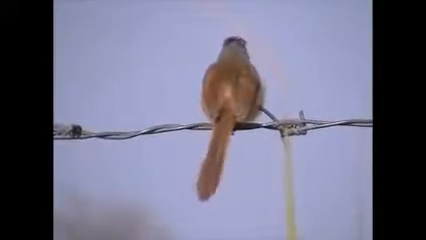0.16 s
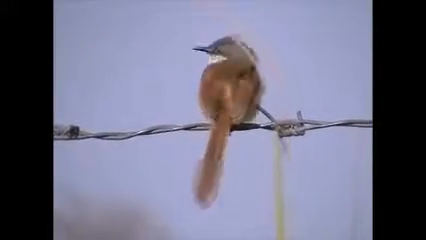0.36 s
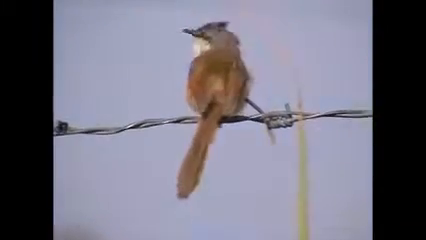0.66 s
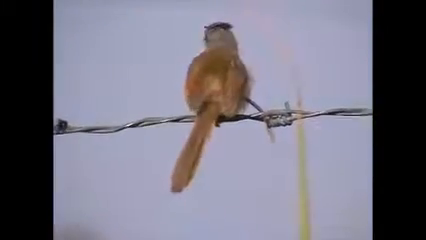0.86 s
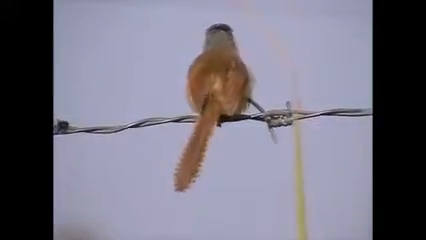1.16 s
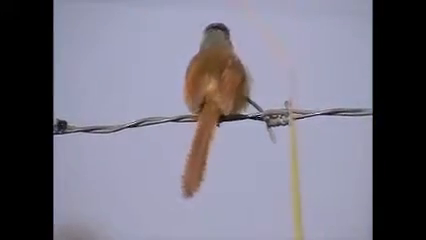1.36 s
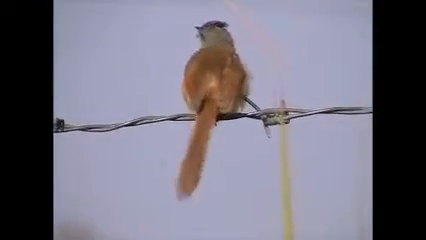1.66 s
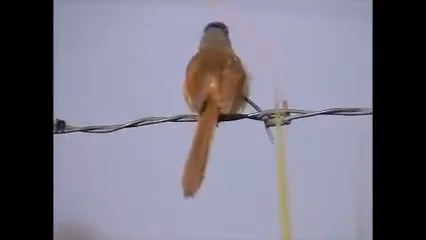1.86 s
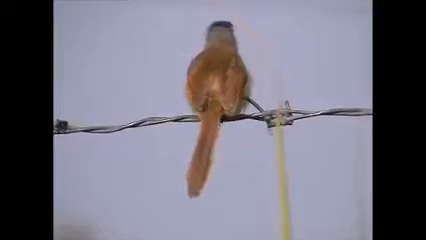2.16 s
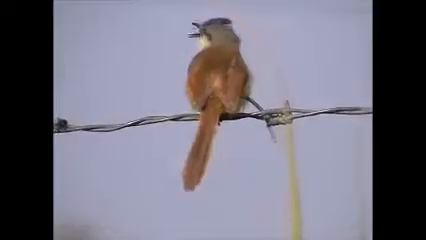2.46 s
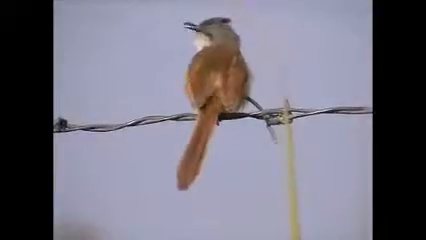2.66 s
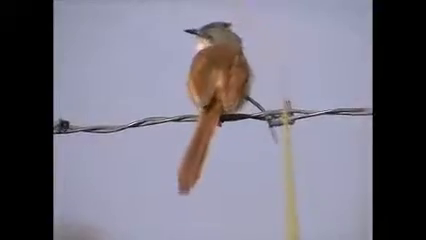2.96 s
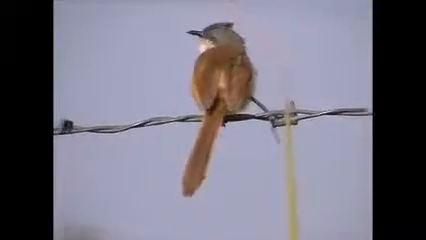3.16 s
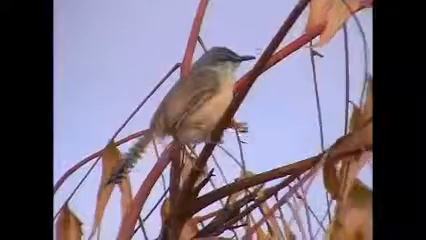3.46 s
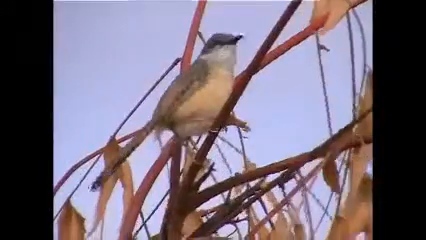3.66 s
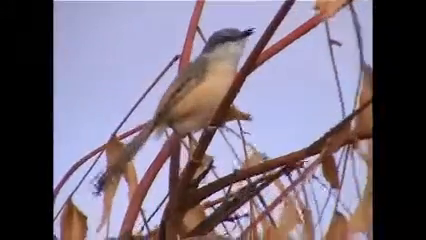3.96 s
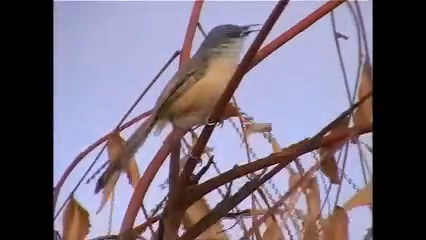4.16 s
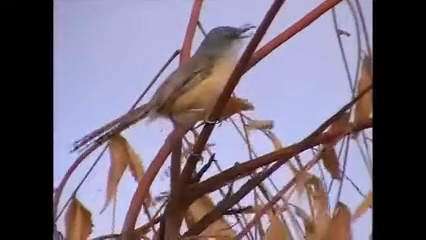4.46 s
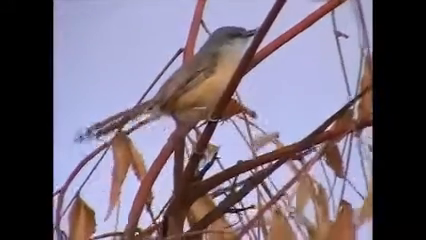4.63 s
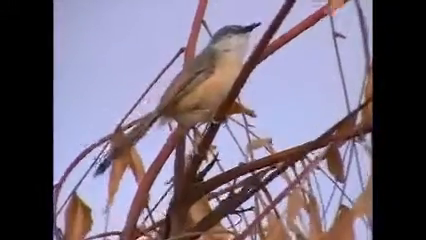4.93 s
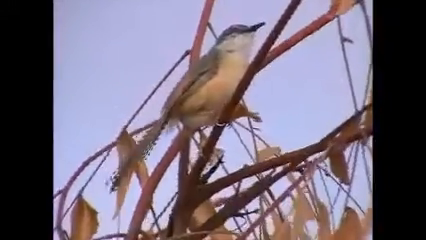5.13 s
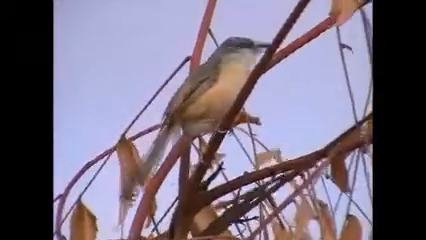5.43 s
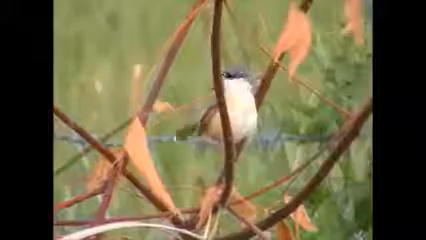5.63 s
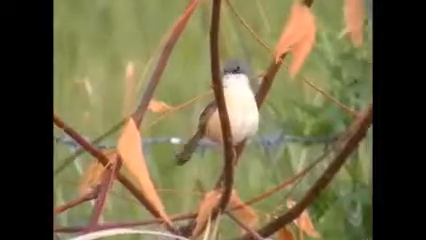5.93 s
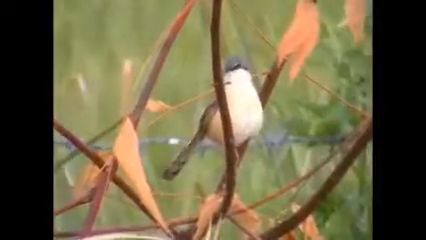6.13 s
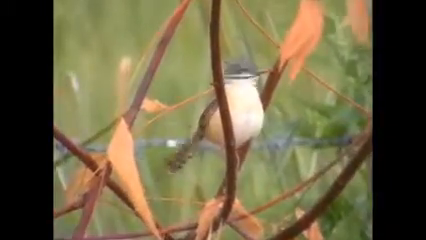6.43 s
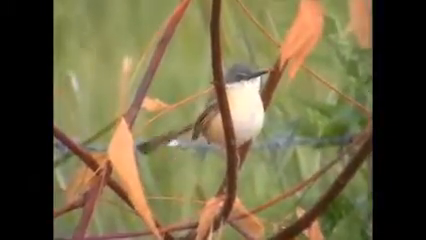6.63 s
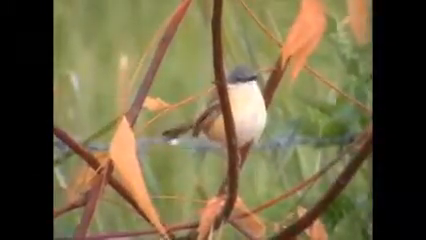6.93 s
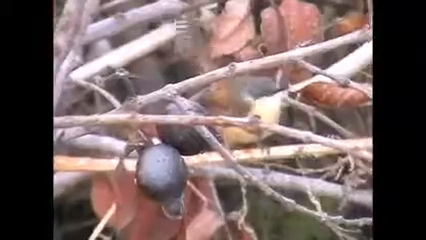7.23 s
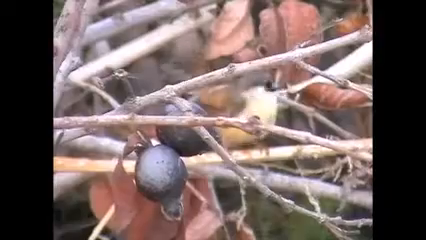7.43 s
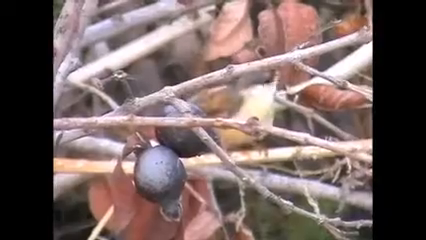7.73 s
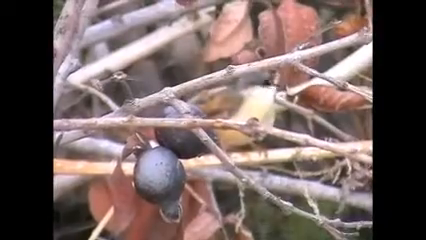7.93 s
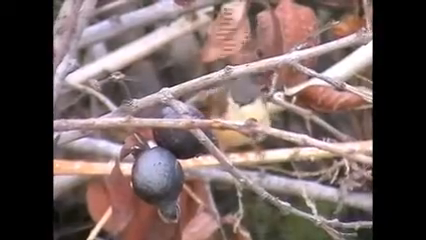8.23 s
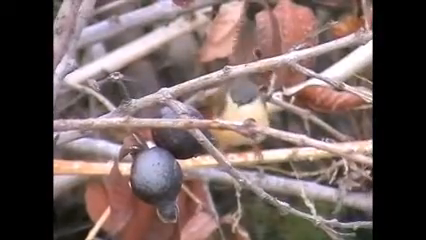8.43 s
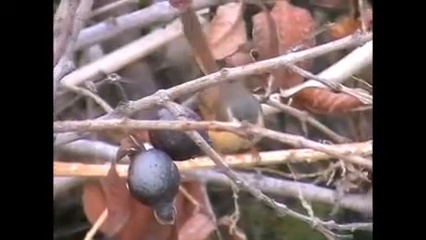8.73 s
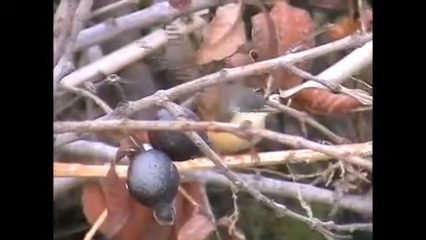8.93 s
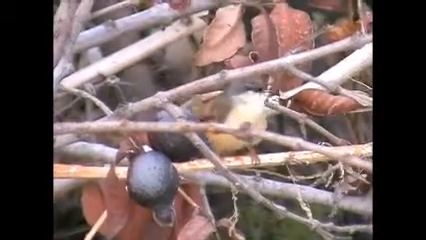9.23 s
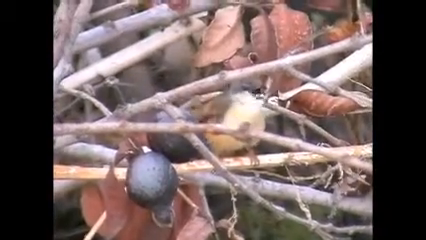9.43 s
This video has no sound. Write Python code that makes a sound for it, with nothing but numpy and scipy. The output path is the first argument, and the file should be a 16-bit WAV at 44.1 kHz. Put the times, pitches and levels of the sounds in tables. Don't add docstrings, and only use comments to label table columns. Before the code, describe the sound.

Quick runs of thin piercing chirps from a small warbler outdoors, with faint distant birds, a far cockerel, late crow caws and microphone hiss.

```python
import sys
import numpy as np
from scipy import signal
from scipy.io import wavfile
from scipy.ndimage import uniform_filter1d

SR = 44100
rng = np.random.default_rng(int(sys.argv[2]) if len(sys.argv) > 2 else 0)


def dump_mix(stems):
    frames = np.atleast_2d(stems).T
    limited = np.clip(frames, -1, 1)
    pcm = np.round(limited * 32767).astype(np.int16)
    wavfile.write(sys.argv[1], SR, pcm)


def how_loud(loudness_db):
    steps = np.asarray(loudness_db, float) / 20
    return 10 ** steps


N = 422919


def band(x, centre_hz, width_hz):
    edges = [centre_hz - width_hz / 2, centre_hz + width_hz / 2]
    y = signal.sosfilt(signal.butter(2, edges, "bandpass", fs=SR, output="sos"), x)
    return y / np.sqrt(np.mean(y ** 2))


def walk(rate_hz):
    hold = int(SR / rate_hz)
    steps = np.repeat(rng.standard_normal(N // hold + 1), hold)
    return 2.4 * uniform_filter1d(uniform_filter1d(steps, hold), hold)[:N]


def bump(middle_s, length_ms):
    t = np.arange(N) / SR
    return np.exp(-.5 * ((t - middle_s) / (length_ms / 3000)) ** 2)


def field():
    # f/Hz, level/dB per Hz
    air = np.array([(25, -27.5), (95, -9.5), (190, -5.5), (300, -9), (1200, -2.5), (3900, -6.5),
                    (6300, -14), (8000, -21), (13000, -38.5)])
    # t/s, rumble/dB, hush/dB, hiss/dB
    backgrounds = [
        [(0.0, -64, -50.5, -69), (2.99, -64.5, -52, -68), (3.39, -64.5, -51, -73)],
        [(3.43, -69.5, -52.5, -68), (6.53, -64.5, -50, -63), (7.05, -65.5, -51, -69.5)],
        [(7.07, -83, -58.5, -68), (8.02, -64.5, -54.5, -69), (9.59, -65.5, -52.5, -69)],
    ]
    t = np.arange(N) / SR
    s, *levels = np.vstack(backgrounds).T
    change = np.array([np.interp(t, s, db) - np.mean(db) for db in levels])
    swell = walk(1.8)
    out = 0
    for hz in 28 * 2 ** np.arange(0, 9.1, .5):
        mid, side = (band(rng.standard_normal(N), hz, .46 * hz) for _ in range(2))
        shares = [np.interp(np.log(hz), np.log([200, 1000, 3200]), row) for row in np.eye(3)]
        db = np.interp(np.log(hz), np.log(air[:, 0]), air[:, 1]) + 10 * np.log10(hz) + shares @ change
        stereo = mid + how_loud(-19) * side * np.array([[1], [-1]])
        out = out + how_loud(db + .8 * swell + 1.2 * walk(9)) * stereo
    out = signal.sosfilt(signal.butter(10, 13300, fs=SR, output="sos"), out)
    return out * how_loud(-48.5) / np.sqrt(np.mean(out ** 2))


def cockerel():
    # start t/s, end t/s, f/Hz, level/dB
    start, end, hz, db = (.78, 2.8, 765, -59)
    t = np.arange(N) / SR
    phase = 2 * np.pi * np.cumsum(hz * (1 + .0038 * walk(25))) / SR
    gate = uniform_filter1d(1. * ((t > start) & (t < end)), 3000)
    level = gate * how_loud(db - 1.3 * (t - start) + 1.2 * walk(6.24))
    return level * (np.sin(phase) + 1.5 * np.sin(2 * phase) + 1.4 * np.sin(3 * phase))


def crows():
    # middle t/s, level/dB
    caws = [
        (8.13, -48),
        (8.51, -48.5),
        (8.81, -52),
        (9.19, -48.5),
    ]
    # f/Hz, width/Hz, level/dB
    resonances = [
        (700, 91, -8),
        (1060, 50, -10.5),
        (1646, 91, -6),
    ]
    t = np.arange(N) / SR
    rasp = rng.standard_normal(N) * (1 + .6 * np.sin(2 * np.pi * 65 * t))
    throat = sum(how_loud(db) * band(rasp, hz, width) for hz, width, db in resonances)
    return throat * sum(how_loud(db) * bump(s, 200) for s, db in caws)


def buzzes():
    # middle t/s, length/ms, centre f/Hz, width/Hz, level/dB
    bursts = [
        (7.015, 60, 6300, 1300, -33),
        (4.42, 140, 2150, 600, -44),
        (4.03, 70, 2600, 500, -43),
        (.735, 14, 2800, 1500, -41),
    ]
    throb = rng.standard_normal(N) * how_loud(4.7 * walk(150))
    out = 0
    for s, ms, hz, width, db in bursts:
        rasp = band(band(throb, hz, width), hz, 2 * width)
        out = out + how_loud(db) * bump(s, ms) * rasp
    return out


def twig_ticks():
    # t/s, peak level/dB
    ticks = [
        (3.7589, -25.5),
        (5.439, -23.5),
        (8.986, -27),
    ]
    crack = band(band(rng.standard_normal(N), 8500, 8000), 8500, 8000)
    t = np.arange(N) / SR
    return crack * sum(how_loud(db - 10) * (t > s) * np.exp(-np.abs(t - s) / .002) for s, db in ticks)


def voice(waver):
    return np.array([np.zeros(N), np.zeros(N), waver * walk(260)])


def whistle(out, loudest_s, ms, start_hz, end_hz, db, peak=.5, early=1, late=1, lead=.15, full=1.3):
    size = int(ms * SR / 1000)
    rise, lead = int(np.clip(peak, .1, .9) * size), int(lead * size)
    steps = np.arange(-lead, size)
    u = steps / size
    place = int(loudest_s * SR) - rise + steps
    hz = end_hz + (start_hz - end_hz) * (1 - np.sign(u) * np.abs(u) ** late) ** early
    phase = 2 * np.pi * np.cumsum(hz * (1 + out[2, place % N])) / SR
    attack = np.sin(np.pi / 2 * np.arange(lead + rise) / (lead + rise)) ** full
    release = np.cos(np.pi / 2 * np.linspace(0, 1, size - rise)) ** .9
    swell = np.r_[attack, release]
    overtones = np.sin(2 * phase) + .5 * np.sin(3 * phase / 2)
    note = np.array([swell * np.sin(phase), swell ** 1.5 * (4000 / hz) ** 2 * overtones])
    inside = (place >= 0) & (place < N)
    out[:2, place[inside]] += how_loud(db) * note[:, inside]


def neighbours():
    # start t/s, end t/s, rate/Hz, length/ms, start f/Hz, end f/Hz, level/dB
    whistlers = [
        (.8, 2.85, 6.3, 170, 2920, 2520, -47),
        (.1, .75, 3.3, 190, 2700, 2850, -47),
        (7.28, 7.42, 21, 30, 2750, 2950, -39),
    ]
    twitter_db = (-52, -42)
    out = voice(waver=.006)
    for start, end, rate, ms, start_hz, end_hz, db in whistlers:
        for s in np.arange(start + ms / 2000, end, 1 / rate):
            late, sharp, loud = rng.standard_normal(3)
            first_hz = start_hz * (1 + .025 * sharp)
            whistle(out, s + .15 * late / rate, ms, first_hz, end_hz, db + 3 * loud, full=.6)
    for (start, end), db in zip([(0, N / SR), (5.85, 7.05)], twitter_db):
        for when, pitch, length, bend, far in rng.random((85, 5)):
            s = start + (end - start) * when
            hz = 2200 + 4000 * pitch ** 1.7
            whistle(out, s, 10 + 30 * length, hz, hz * (.7 + .5 * bend), db - 9 * far, early=1.6)
    return out[0]


def echoes(x, bounce_ms, t60_s):
    t = np.arange(SR // 2) / SR
    decay = 10 ** (-3 * t / t60_s) + how_loud(-34) * 10 ** (-3 * t / .6)
    mid, side = rng.standard_normal((2, len(t))) * (t > .003) * decay
    mid = mid / np.sqrt(np.sum(mid ** 2))
    side = how_loud(-20) * side / np.sqrt(np.sum(side ** 2))
    mid[int(bounce_ms * SR / 1000)] += .8
    return np.array([signal.fftconvolve(x, ear)[:N] for ear in (mid + side, mid - side)])


def song_hiss(tone):
    effort = np.abs(uniform_filter1d(np.abs(tone), 130)) ** 1.5
    mid, side = (band(rng.standard_normal(N), 9300, 11000) for _ in range(2))
    return how_loud(-39) * effort * (mid + .3 * side * np.array([[1], [-1]]))


def song():
    # loudest t/s, length/ms, start f/Hz, end f/Hz, peak level/dB
    even = [(0.01, 27, 7080, 6060, -17), (0.056, 31, 5610, 5210, -16.5), (0.945, 12, 5510, 4800, -19.5),
            (1.164, 28, 4490, 4150, -20), (1.242, 13, 5170, 4750, -21), (1.262, 25.5, 5550, 5130, -16.5),
            (1.46, 8.3, 4390, 3860, -27), (1.783, 15, 4520, 3460, -29), (1.896, 24.5, 5380, 5430, -13.5),
            (2.136, 17, 4310, 4070, -21), (2.75, 7.1, 4350, 3560, -21), (2.87, 28, 5270, 5710, -17),
            (3.851, 28, 4680, 4380, -33), (4.182, 19, 4560, 4440, -21.5), (4.205, 35, 3500, 4260, -28),
            (4.449, 7, 4600, 4900, -27), (4.718, 8.6, 4300, 3970, -22), (4.973, 55, 3120, 2990, -38),
            (5.015, 30, 4150, 3880, -28), (5.024, 7.7, 4640, 4300, -23.4), (5.043, 12.6, 5110, 4480, -18.5),
            (5.176, 23, 5060, 5510, -35), (5.825, 38, 2530, 2110, -35.5), (5.888, 10, 4080, 3860, -29),
            (5.932, 11, 4930, 4950, -12.4), (5.939, 11, 4660, 5180, -19), (6.121, 14, 3310, 3050, -30.1),
            (6.147, 15, 2920, 2490, -29.5), (6.162, 18, 2900, 2630, -32.5), (6.239, 17, 4280, 4150, -24.5),
            (6.312, 8.5, 6280, 5840, -20.5), (6.54, 15, 4280, 4160, -21), (6.64, 16, 3840, 3840, -18.5),
            (6.792, 21, 2670, 2330, -34.5), (7.482, 18, 5830, 5300, -7.5), (7.626, 8.3, 7200, 6300, -18),
            (7.734, 25, 5520, 4800, -11.5), (7.769, 20.4, 6290, 6215, -2), (7.927, 5.5, 7170, 6260, -15),
            (7.952, 30.5, 6054, 6290, -2.5), (8.04, 10.6, 5410, 4980, -7.5), (9.395, 35, 6760, 5670, -7.5),
            (9.49, 18, 5480, 4920, -7), (9.498, 4.7, 3350, 3630, -23.5)]
    swelling = [(0.043, 19, 5370, 4750, -21.5), (0.839, 52, 3190, 3300, -32), (1.127, 43, 3340, 3580, -28),
                (1.192, 12, 7200, 6600, -29.8), (1.442, 48, 3910, 3320, -31), (1.526, 34, 7070, 6220, -14),
                (1.55, 16, 5900, 4770, -20.5), (1.76, 48, 3370, 3600, -34), (1.803, 20, 4460, 4080, -23.5),
                (1.844, 24, 6780, 6070, -17), (1.874, 16, 5190, 4910, -19), (2.097, 52, 3200, 3870, -31.5),
                (2.16, 8.4, 6960, 6350, -26), (2.231, 52, 5200, 5750, -14.5),
                (2.422, 41, 3430, 3510, -27.5), (2.457, 21, 3900, 4120, -22),
                (2.505, 25, 7010, 6050, -18.5), (2.734, 43, 3570, 3400, -31), (2.774, 22, 4450, 3900, -23),
                (2.8, 19, 6940, 6870, -35), (2.82, 20, 7040, 5950, -14), (3.808, 41, 2740, 2876, -34.5),
                (3.867, 17, 4880, 4810, -21), (4.116, 48, 3080, 2790, -38), (4.154, 39, 3600, 4050, -29.5),
                (4.226, 10, 5460, 3980, -19), (4.398, 54, 3240, 2845, -35), (4.43, 22, 4130, 3900, -31.5),
                (4.443, 12, 4550, 4300, -28.5), (4.485, 24, 3480, 4070, -26), (4.681, 50, 3170, 3035, -36),
                (4.73, 12, 4610, 4750, -27), (5.153, 44, 5400, 5200, -31.5), (5.274, 48, 2784, 2720, -33.5),
                (5.576, 44, 2160, 2750, -39.5), (5.868, 25, 3570, 3410, -25), (5.905, 17, 4290, 4140, -20),
                (5.976, 11, 5300, 5800, -19.5), (6.18, 16, 2800, 2550, -31), (6.196, 38, 3500, 3670, -37.5),
                (6.467, 41, 5200, 4150, -39.5), (6.503, 36, 3530, 3370, -24.5), (6.52, 16, 4050, 3860, -26),
                (6.529, 8, 4030, 3780, -24), (6.542, 56, 6000, 5580, -40), (6.622, 23, 6200, 5600, -16.5),
                (6.821, 29, 2890, 2390, -37.5), (7.509, 13, 8170, 7160, -24), (7.743, 8, 2990, 3800, -26),
                (7.755, 8, 7600, 6500, -26), (7.886, 14, 5880, 4840, -14.5), (8.063, 10, 7950, 7260, -22),
                (9.236, 24, 6110, 5170, -11.5), (9.256, 10, 8370, 7200, -24.5),
                (9.329, 8, 6130, 5300, -14.5), (9.375, 12, 8300, 6600, -26), (9.509, 8, 7770, 6600, -25.1)]
    fading = [(0.075, 19, 5620, 5430, -22.5), (0.874, 105, 2910, 2696, -37.5),
              (0.886, 13, 4870, 3630, -30.5), (0.96, 35, 5200, 6350, -16.5), (1.487, 8.6, 4470, 4200, -30),
              (1.57, 28.6, 5360, 5500, -14), (1.808, 6.8, 5000, 4300, -26.5), (1.918, 29, 5400, 5480, -28),
              (2.143, 7.3, 5040, 4970, -23.5), (2.544, 39, 5330, 5570, -16.5),
              (2.78, 6.9, 4770, 4240, -24.2), (3.874, 7.7, 4640, 4600, -25), (4.052, 42, 2420, 2700, -36),
              (4.231, 16, 4240, 3370, -22.5), (4.458, 23, 4890, 4770, -31), (4.744, 22, 4920, 4910, -20),
              (5.2, 54, 5400, 6200, -36), (5.29, 17, 3900, 3500, -34), (5.32, 8.9, 4310, 4320, -29),
              (5.999, 93, 2910, 2580, -34), (6.021, 16, 5100, 4410, -24.5), (6.205, 15, 3450, 3680, -33),
              (6.217, 17, 4170, 4060, -32), (6.321, 9.2, 5930, 5300, -10.5), (6.591, 8.8, 4220, 4200, -18),
              (6.626, 7.2, 4930, 5400, -18.5), (6.839, 23, 3160, 2370, -33.5),
              (7.494, 10.5, 3960, 4260, -20), (7.745, 22, 3954, 4200, -23), (7.9, 19, 5470, 5340, -9),
              (7.919, 9.3, 3990, 4370, -23.5), (7.924, 20, 3520, 4400, -32), (8.049, 23, 3976, 4350, -26.5),
              (8.091, 13.4, 6490, 6620, -18.5), (9.245, 16, 4004, 4300, -23.5),
              (9.334, 10, 5020, 5540, -10.5), (9.503, 6.8, 3810, 4100, -22)]
    hooked = [(0.855, 9.5, 4360, 3530, -26.5), (1.147, 8.1, 4450, 3850, -26.5),
              (2.116, 16, 4480, 4030, -21.5), (2.18, 20.6, 6680, 6190, -11.5),
              (2.439, 8.1, 4450, 3700, -23.5), (2.464, 6.1, 4920, 3960, -21.5),
              (2.528, 13, 5280, 4650, -19), (3.893, 17, 3240, 4330, -23.5), (4.697, 7.6, 4060, 3750, -31),
              (4.767, 27, 3590, 4220, -26.5), (5.065, 14, 3510, 4150, -22), (5.313, 10, 4200, 3770, -25),
              (5.362, 22, 3310, 4120, -24.5), (5.914, 6.9, 5160, 4580, -16), (5.954, 18, 3360, 4480, -21),
              (5.965, 8.9, 5070, 4360, -24.5), (6.25, 10, 5450, 4380, -15), (6.289, 18, 3860, 4170, -18.5),
              (6.304, 5.7, 5020, 4560, -13.5), (6.335, 11.5, 4500, 3780, -24.5),
              (6.549, 9.8, 5090, 4600, -19.5), (6.569, 14, 4880, 4860, -11.5),
              (6.587, 4, 3990, 3890, -14.5), (6.602, 7, 5270, 4440, -20), (7.465, 3.9, 6660, 5500, -9.5),
              (7.584, 8.7, 6330, 5130, -6.5), (7.602, 22, 5950, 5020, -9.5), (7.618, 8, 3580, 4043, -19),
              (7.647, 21, 6460, 6270, -6), (7.711, 13, 5680, 4920, -12), (7.786, 15.6, 6190, 5540, -9),
              (7.915, 10.5, 3310, 3630, -26.5), (8.014, 3.8, 5930, 5420, -12.5),
              (8.029, 9, 5050, 5370, -16.5), (8.076, 27, 6630, 6420, -5), (9.217, 16, 6100, 5460, -22),
              (9.269, 21, 7120, 6200, -6.5), (9.283, 18, 6770, 6210, -20), (9.35, 22, 5457, 4980, -7),
              (9.365, 16, 3470, 4190, -18), (9.468, 9.5, 5930, 4920, -10.5), (9.528, 32, 6850, 6110, -5)]
    plunging = [
        (3.911, 36.2, 5770, 3440, -25),
        (4.499, 34.2, 5520, 3480, -24),
        (4.785, 38, 5380, 3470, -22.5),
        (5.082, 32.7, 6060, 3530, -23),
        (5.379, 31.2, 5330, 3420, -22),
    ]
    bent = [(0.876, 19, 4150, 3710, -25), (0.92, 19.6, 6910, 5900, -18), (1.209, 15.6, 6670, 5720, -9),
            (1.481, 22, 4130, 3710, -20.5), (2.848, 22, 5200, 4610, -23.5), (5.339, 13, 4430, 4130, -22),
            (5.995, 20.7, 6150, 6015, -3), (6.194, 12, 2730, 2330, -32.5), (6.27, 9.8, 5060, 4910, -10.5),
            (7.524, 20, 6330, 7150, -3), (8.019, 5.7, 5270, 4765, -9.5)]
    shapes = [(even, .49, 1, 1, .15), (swelling, .74, 1, 1, .15), (fading, .27, 1, 1, .15),
              (hooked, .49, 2.2, 1, .08), (plunging, .2, 3, 1, .12), (bent, .65, 1, 2.2, .22)]
    out = voice(waver=.007)
    for notes, *shape in shapes:
        for note in notes:
            whistle(out, *note, *shape)
    tone, octave = out[:2]
    return tone * how_loud(.8 * walk(300)), octave * how_loud(3 * walk(500))


def scene():
    # start t/s, overtone level/dB, ground bounce/ms, echo level/dB, echo decay/s
    shots = [
        (0, -44, 6.7, -11.5, 0.13),
        (3.42, -28, 3.84, -5.5, 0.067),
        (5.6, -39.5, 4, -8.5, 0.068),
        (7.063, -37.5, 5.04, -11, 0.071),
    ]
    tone, octave = song()
    far = neighbours() + cockerel() + crows() + buzzes() + twig_ticks()
    out = field() + song_hiss(tone)
    t = np.arange(N) / SR
    ends = [row[0] for row in shots[1:]] + [N / SR]
    for (start, octave_db, bounce_ms, echo_db, t60_s), end in zip(shots, ends):
        shot = (t >= start) & (t < end)
        direct = shot * (tone + how_loud(octave_db) * octave + far)
        out = out + shot * (direct + how_loud(echo_db) * echoes(direct, bounce_ms, t60_s))
    return out


def band_limit(x):
    return signal.sosfilt(signal.butter(12, 15500, fs=SR, output="sos"), x)


def record(dry):
    # start t/s, end t/s
    dip_start, dip_end = (3.392, 3.422)
    t = np.arange(N) / SR
    gap = np.where((t > dip_start) & (t < dip_end), how_loud(-24), 1)
    overload = uniform_filter1d(np.abs(dry) / .5, 44)
    return band_limit(dry * gap / (1 + overload ** 4) ** (1 / 4))


dry = scene()
out = record(dry)
dump_mix(out)
```